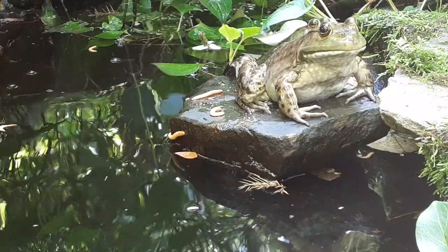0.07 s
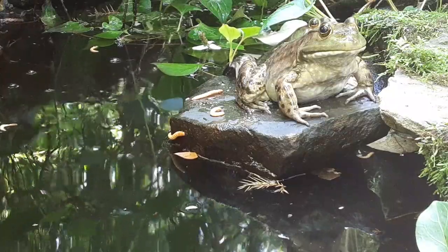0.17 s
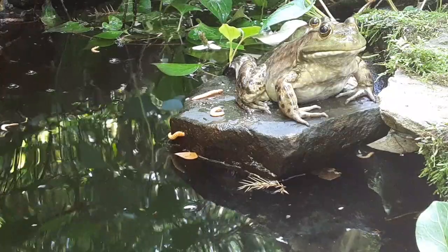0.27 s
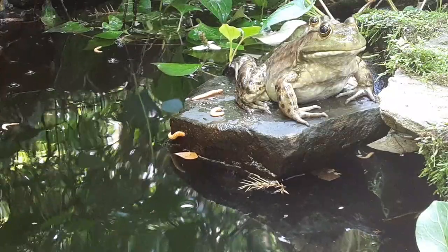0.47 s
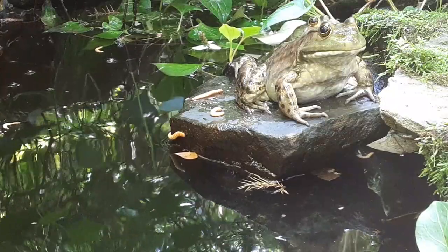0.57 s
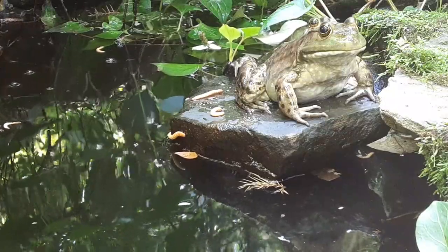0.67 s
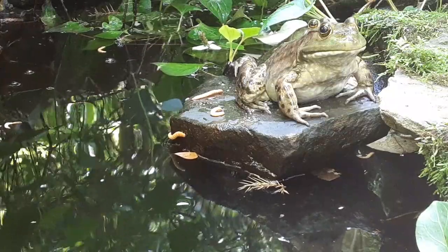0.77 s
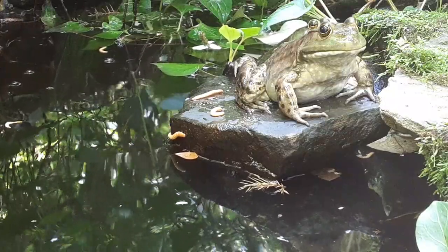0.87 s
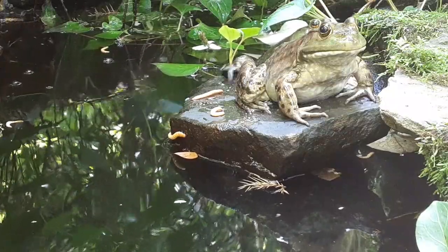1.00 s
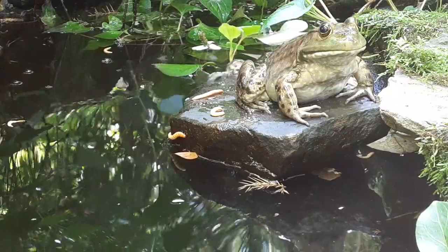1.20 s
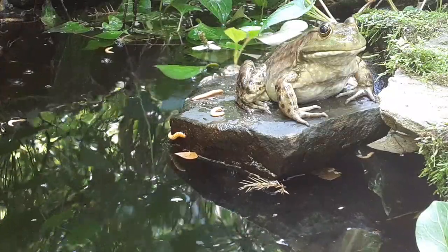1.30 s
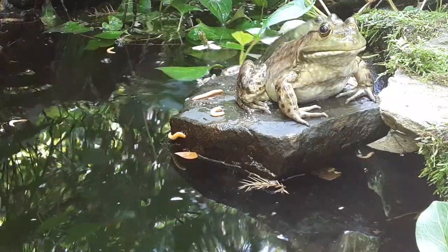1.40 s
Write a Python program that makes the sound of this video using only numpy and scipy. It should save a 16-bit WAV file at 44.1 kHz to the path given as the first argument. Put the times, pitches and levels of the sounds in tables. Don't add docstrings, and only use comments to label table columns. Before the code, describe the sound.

A bullfrog gives one short, low, throaty bellow beside a pond over faint outdoor background noise

```python
import sys
import numpy as np
from scipy import signal
from scipy.fft import rfft, irfft, next_fast_len
from scipy.io import wavfile
from scipy.ndimage import uniform_filter1d, map_coordinates

SR = 44100
rng = np.random.default_rng(int(sys.argv[2]) if len(sys.argv) > 2 else 0)


def volts_from_decibels(level):
    exponent = np.asarray(level, float) / 20
    return 10 ** exponent


def unload_wav(signal):
    wavfile.write(
        sys.argv[1],
        SR,
        np.round(np.clip(np.atleast_2d(signal).T, -1, 1) * 32767).astype(np.int16),
    )


N = 63945
T = np.arange(N) / SR

# (frequency [Hz], level [dB])
TRAFFIC = [(25, -25), (65, -4.5), (125, -4.5), (300, -11.5), (450, -13), (900, -8), (1250, -11.5),
           (2000, -26), (3000, -43)]
# (frequency [Hz], level [dB])
AIR = [(1180, -35.5), (2000, -7.5), (2660, -11.5), (4040, -4), (5380, -14.5), (6120, -13), (7480, -28.5),
       (11900, -18.5), (15900, -16.5)]
# (frequency [Hz], likeness [-1 to 1])
PORT_LIKENESS = [(60, 1), (240, 0.8), (950, 0.07), (3770, -0.76), (15000, -0.27)]
# (frequency [Hz], half of left minus right [dB])
PORT_TILT = [(60, 1.2), (300, 0.3), (1000, -2.16), (8000, 2), (14000, -2.9)]
# (time [s], level [dB])
CRICKETS = [(0, -73), (.2, -77), (.3, -68), (.37, -60), (.39, -65), (.432, -61), (.442, -53), (.48, -61),
            (.555, -59), (.58, -63), (.65, -58), (.67, -62), (.73, -59), (.8, -65), (1.0, -68), (1.1, -75),
            (1.45, -78)]
# (frequency [Hz], width [Hz], level [dB], end [s])
TRILLS = [
    (7680, 750, -68, 0.043),
    (2186, 34, -66, 0.12),
    (1030, 180, -65.5, 0.16),
]
# (time [s], level [dB])
RUSTLE = [(0, -64), (.05, -76.5), (.195, -89), (.215, -62), (.3, -54), (.4, -59), (.5, -65.5), (.62, -84)]
# (frequency [Hz], width [Hz], level [dB])
RUSTLE_BANDS = [(4360, 230, -5), (5270, 390, 1.5), (5820, 460, 0), (6580, 520, -5), (8600, 500, -16)]
# (time [s], pitch [Hz], level [dB])
EARLY_HOOT = [(.03, 273.4, -58.5), (.1, 263.3, -57), (.13, 239, -54), (.16, 246, -92)]
# (time [s], pitch [Hz], level [dB])
HOOT = [(.59, 316, -65), (.62, 309.3, -50), (.67, 280.5, -50.5), (.715, 269, -57.5), (.74, 246.4, -51.5),
        (.79, 241, -58.5)]
# (time [s], pulse rate [Hz])
PITCH = [(.14, 123.2), (.22, 121.8), (.3, 120.4), (.36, 116.35), (.43, 112.1), (.56, 111.25)]
# (time [s], level [dB], brightness [dB], sac fullness [0-1])
EFFORT = [
    (.09, -56, -11, 0.38),
    (.15, -44.5, -30, 0.34),
    (.22, -31.5, -11.5, 0.6),
    (.28, -26.5, -4, 0.35),
    (.335, -22.5, -1, 0.82),
    (.38, -23, -4.5, 0.82),
    (.44, -26.5, -11, 0.98),
    (.52, -33, -15, 0.51),
    (.585, -55, -13, 1),
]
# (time [s], rate [Hz], shift [cycles])
FLUTTER = [(.14, 32.5, .046), (.24, 38.3, .043), (.32, 36.3, .038), (.345, 35.5, .022), (.42, 35, .004)]
# (frequency [Hz], width [Hz], slack level [dB], full level [dB])
SAC = [(324, 203, -1.5, -7.5), (450.5, 63.4, 8.5, 6), (630, 105, 3, -3), (768, 190, 3.5, -10),
       (921, 47, 1.5, -2), (1208, 62, -33.5, -3)]
# (frequency [Hz], width [Hz], level [dB])
ROOF = [(1389, 221, -4), (1546, 99, 2), (1784, 113, -14), (2010, 65, -17.5), (2360, 40, -20),
        (2797, 70, -19.5)]
# (frequency [Hz], width [Hz], depth [0-1])
WATER_DIPS = [(773, 68, 0.9), (1447, 91, 1), (1900, 170, 1)]
# (time [s], level [dB])
DRIPS = [
    (1.282, -53.5),
    (1.349, -49),
    (1.358, -60),
    (1.379, -50.5),
]

TRAFFIC_DB, AIR_DB, HISS_RISE = -51, -63, .13
CRICKET_HZ, CRICKET_WIDE_HZ, CHIRP_DB, CHORUS_DB = 3975, 150, 3.5, 2.5
HALO_HZ, HALO_WIDE_HZ, HALO_DB = 4000, 1700, -6.5
GRAIN_DB = 1.6
START_S, RELEASE_S = .14, .515
PULSE_PHASE, FLUTTER_PHASE, FLUTTER_LEAD = -.053, .808, .75
FLUTTER_DB, SCATTER_DB, JITTER = 1.5, .7, .005
LOW_FLUTTER, HIGH_FLUTTER, SPLIT_HZ = .36, .89, 650
RASP_DB, ROOF_RASP_DB, RELEASE_RASP_DB = -17, -3, 20
LOW_CUT_HZ, HIGH_CUT_HZ, ROOF_LAG_S = 270, 1150, .0009
RING_HZ, RING_WIDE_HZ = 460, 120
RING_SLACK, RING_FULL, TURN_SLACK, TURN_FULL = .25, .7, -.2, -1.9
FROG_PAN_DB, FROG_LEAD = 1.1, .26
BANK_DB, BANK_T60 = -14, .17
TOP_HZ = 15780


def unit(x):
    return x / np.sqrt(np.mean(x ** 2) + 1e-20)


def along(points, hz):
    f, v = np.transpose(points)
    return np.interp(np.log(hz + 1), np.log(f + 1), v)


def curves(rows):
    s, *cols = np.transpose(rows)
    return [np.interp(T, s, c) for c in cols]


def wobble(rate):
    return map_coordinates(rng.standard_normal(400), [T * rate % 390])


def filtered(x, response):
    m = next_fast_len(N + 8192)
    return irfft(rfft(x, m) * response(np.fft.rfftfreq(m, 1 / SR)), m)[..., :N]


def resonance(f, center, width):
    return 1j * f * width / (center * center - f * f + 1j * f * width)


def peaks(rows, f):
    return sum((-1) ** k * volts_from_decibels(db) * resonance(f, c, w) for k, (c, w, db) in enumerate(rows))


def rush(response, patchy_db=0):
    z = signal.stft(rng.standard_normal((2, N)), nperseg=512)[2]
    patches = uniform_filter1d(rng.standard_normal(z.shape[1:]), 5, 0)
    patches = unit(uniform_filter1d(patches, 10, 1))
    pair = signal.istft(z * volts_from_decibels(patchy_db * patches), nperseg=512)[1][:, :N]

    def spread(f):
        turn = np.arccos(np.clip(along(PORT_LIKENESS, f), 0, 1)) / 2
        return response(f) * [np.cos(turn), np.sin(turn)]
    mid, side = filtered(pair, spread)
    return unit(np.array([mid + side, mid - side]))


def background():
    traffic = volts_from_decibels(TRAFFIC_DB + .8 * wobble(3)) * rush(lambda f: volts_from_decibels(along(TRAFFIC, f)), patchy_db=1)
    air = volts_from_decibels(AIR_DB + 1.1 * wobble(4.6)) * rush(lambda f: volts_from_decibels(along(AIR, f)), patchy_db=1.8)
    return filtered(traffic + air, lambda f: volts_from_decibels(along(PORT_TILT, f) * [[1], [-1]]))


def insects():
    def band(hz, wide):
        return lambda f: peaks([(hz, wide, 0)], f) ** 2
    chirps = unit(volts_from_decibels(CHIRP_DB * wobble(94.66)) * rush(band(CRICKET_HZ, CRICKET_WIDE_HZ)))
    chirps = chirps + volts_from_decibels(HALO_DB) * rush(band(HALO_HZ, HALO_WIDE_HZ), patchy_db=-3)
    out = volts_from_decibels(curves(CRICKETS)[0] + CHORUS_DB) * chirps * volts_from_decibels([[-1.2], [1.2]])
    for hz, wide, db, end in TRILLS:
        level_db = db - 50 * np.clip(T - end, 0, 1) + wobble(27)
        out = out + volts_from_decibels(level_db) * rush(band(hz, wide))
    return out


def rustle():
    def leaf(f):
        return peaks(RUSTLE_BANDS, f) * (f / (f + 4000)) ** 2
    grains = unit(volts_from_decibels(GRAIN_DB * wobble(200)) * rush(leaf, patchy_db=.5))
    return volts_from_decibels(curves(RUSTLE)[0] - 31 * np.clip(T - RUSTLE[-1][0], 0, 1)) * grains


def hoot(rows):
    start, end = rows[0], rows[-1]
    hz, db = curves([(start[0] - .02, start[1], -90), *rows, (end[0] + .022, end[1], -90)])
    tone = np.sin(2 * np.pi * np.cumsum(hz) / SR)
    return np.sqrt(2) * volts_from_decibels(db + 1.1 * wobble(30.3)) * tone * volts_from_decibels([[1.5], [-1.5]])


def vocal_cords(gain):
    (pitch,), (rate, shift) = curves(PITCH), curves(FLUTTER)

    def turns(hz):
        return (np.cumsum(hz) - hz[:round(START_S * SR)].sum()) / SR
    beat = 2 * np.pi * (turns(rate) + FLUTTER_PHASE)
    steady = turns(pitch) + PULSE_PHASE
    chance = rng.standard_normal((70, 2))

    def pulses(share):
        phase = steady - share * shift * np.sin(beat)
        at = np.interp(np.arange(-10, 60) + JITTER * chance[:, 0], phase, np.arange(N))
        swing = shift / shift.max() * np.sin(beat + 2 * np.pi * FLUTTER_LEAD)
        swing = np.interp(at, np.arange(N), swing)
        size = volts_from_decibels(SCATTER_DB * chance[:, 1] + FLUTTER_DB * swing)
        taps = np.floor(at)[:, None] + np.arange(-7, 9)
        shape = size[:, None] * np.sinc(taps - at[:, None]) * np.hanning(16)
        return np.bincount(taps.astype(int).ravel(), shape.ravel(), N) * np.sqrt(SR / pitch)

    def upper(f):
        return 1 / (1 + (SPLIT_HZ / (f + 1)) ** 8)
    low = filtered(pulses(LOW_FLUTTER), lambda f: 1 - upper(f))
    high = filtered(pulses(HIGH_FLUTTER), upper)
    puff = np.exp(-2 * ((steady + .033) % 1)) * rng.standard_normal(N)
    rasp_db = RASP_DB + RELEASE_RASP_DB * np.clip((T - RELEASE_S) / .034, 0, 1)
    return gain * (low + high + volts_from_decibels(rasp_db) * puff), gain * puff


def throat_and_sac(drive, full):
    def sac(column, ring, turn):
        def response(f):
            size = abs(peaks([(r[0], r[1], r[column]) for r in SAC], f))
            size = size / (1 + (LOW_CUT_HZ / (f + 1)) ** 4) / (1 + (f / HIGH_CUT_HZ) ** 4)
            ringing = np.angle(peaks([(RING_HZ, RING_WIDE_HZ, 0)], f))
            return size * np.exp(1j * (ring * ringing - turn))
        return response
    slack = filtered(drive * (1 - full), sac(2, RING_SLACK, TURN_SLACK))
    return slack + filtered(drive * full, sac(3, RING_FULL, TURN_FULL))


def mouth_roof(x):
    def response(f):
        lag = np.exp(-2j * np.pi * f * ROOF_LAG_S)
        return abs(peaks(ROOF, f)) * lag / (1 + (1100 / (f + 1)) ** 4) / (1 + (f / 2600) ** 2)
    return filtered(x, response)


def bullfrog():
    level_db, bright_db, full = curves(EFFORT)
    drive, puff = vocal_cords(volts_from_decibels(level_db) * (T < EFFORT[-1][0]))
    roof = mouth_roof((drive + volts_from_decibels(ROOF_RASP_DB) * puff) * volts_from_decibels(bright_db))
    return volts_from_decibels(17.5) * (throat_and_sac(drive, np.clip(full, 0, 1)) + volts_from_decibels(-1) * roof)


def pond_edge(x):
    def response(f):
        dips = np.prod([1 - np.clip(depth, 0, 1) * resonance(f, c, w) for c, w, depth in WATER_DIPS], axis=0)
        left = volts_from_decibels(FROG_PAN_DB) * np.exp(1j * FROG_LEAD) + 0 * f
        right = volts_from_decibels(-FROG_PAN_DB) * np.exp(-1j * FROG_LEAD) * dips
        return np.array([left, right])
    t = T[:SR // 4]
    tail = rng.standard_normal((2, len(t))) * volts_from_decibels(-60 * t / BANK_T60) * (t > .004)
    bank = signal.fftconvolve(x[None], tail / np.linalg.norm(tail[0]), axes=1)[:, :N]
    return filtered(x, response) + volts_from_decibels(BANK_DB) * bank


def drips():
    fade = sum(volts_from_decibels(db - 60 * np.clip(T - s, 0, .2) / .039) * (T > s) for s, db in DRIPS)
    return volts_from_decibels(-9.5) * fade * rush(lambda f: (f / (f + 1500)) * (f < 15800))


def scene():
    frogs = pond_edge(bullfrog()) + hoot(HOOT) + hoot(EARLY_HOOT)
    return frogs + insects() + rustle() + drips() + background()


def roll_off(x):
    return signal.sosfilt(signal.butter(12, 16320, fs=SR, output="sos"), x)


def record(dry):
    loud = np.sqrt(np.abs(uniform_filter1d(dry[0] ** 2, 4000)))
    hiss = HISS_RISE * volts_from_decibels(-33.5) * np.sqrt(loud) * rush(lambda f: 1.0 * (f > 2000))
    mix = filtered(dry + hiss, lambda f: f < TOP_HZ)
    return roll_off(mix)


dry = scene()
out = record(dry)
unload_wav(out)
```